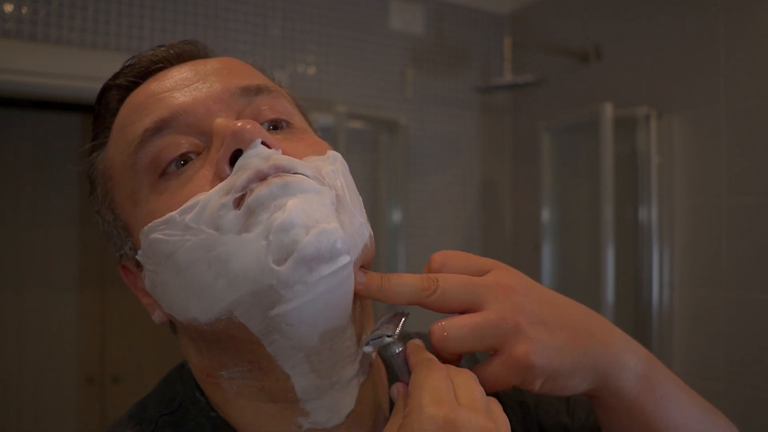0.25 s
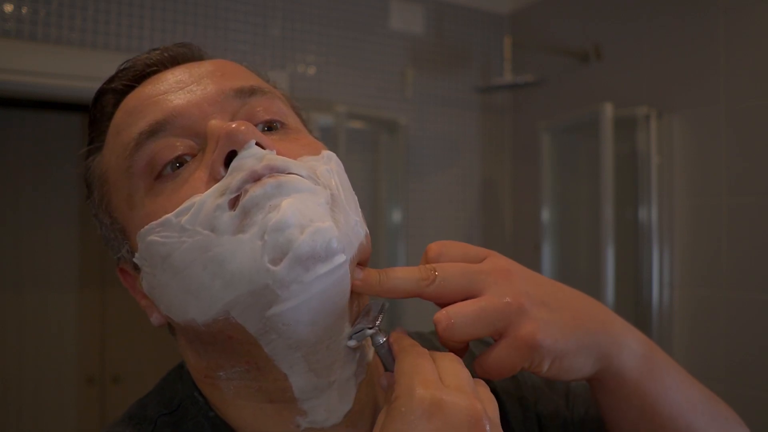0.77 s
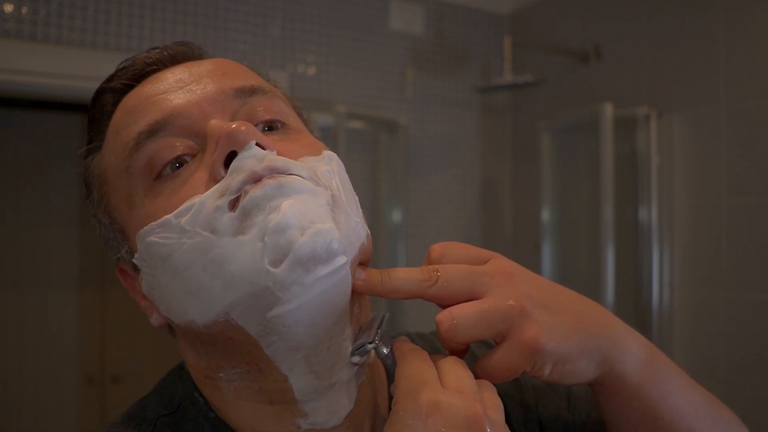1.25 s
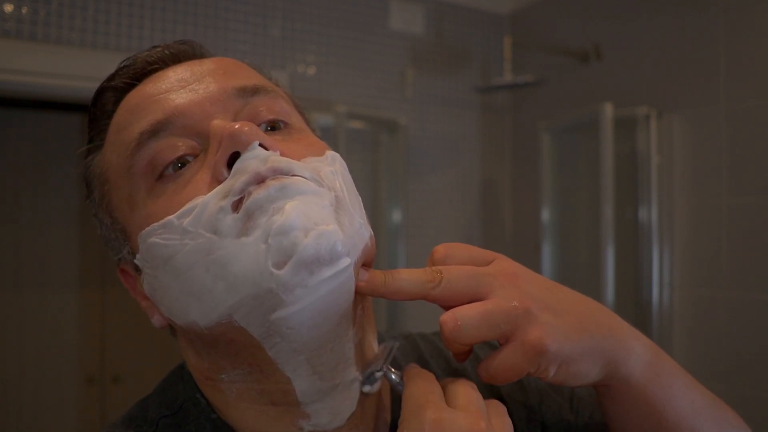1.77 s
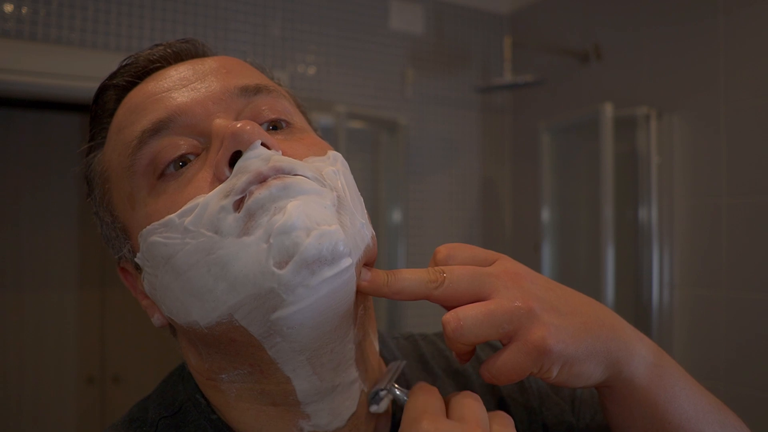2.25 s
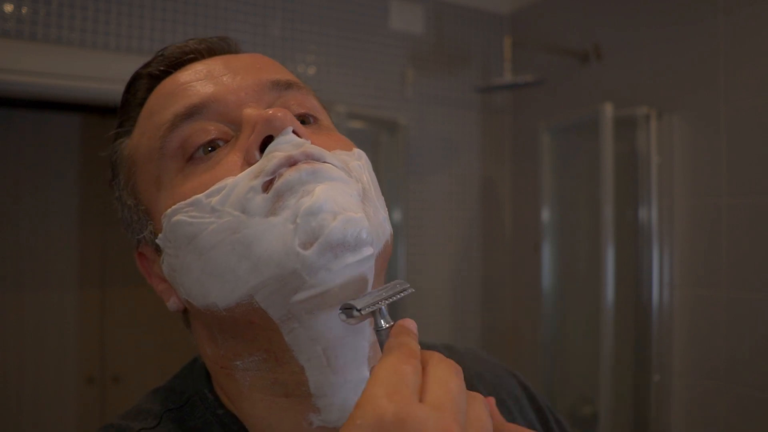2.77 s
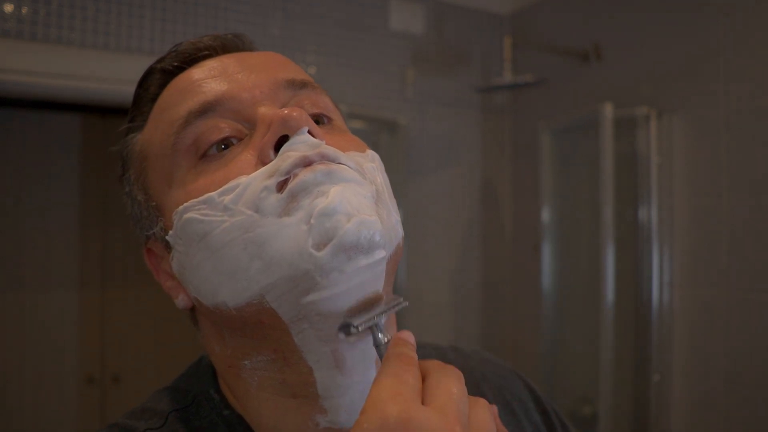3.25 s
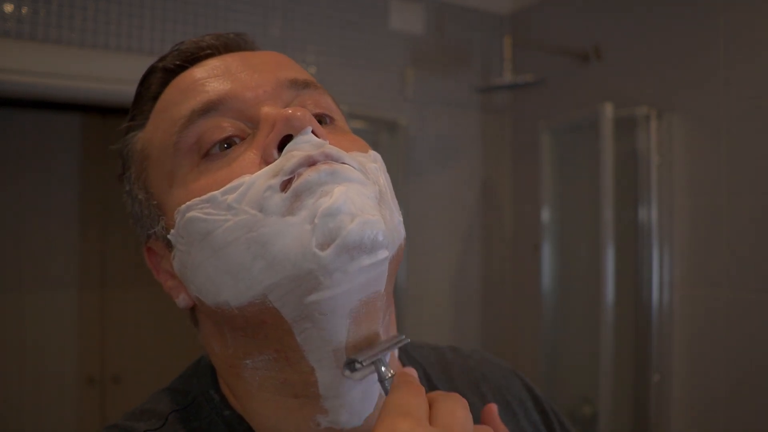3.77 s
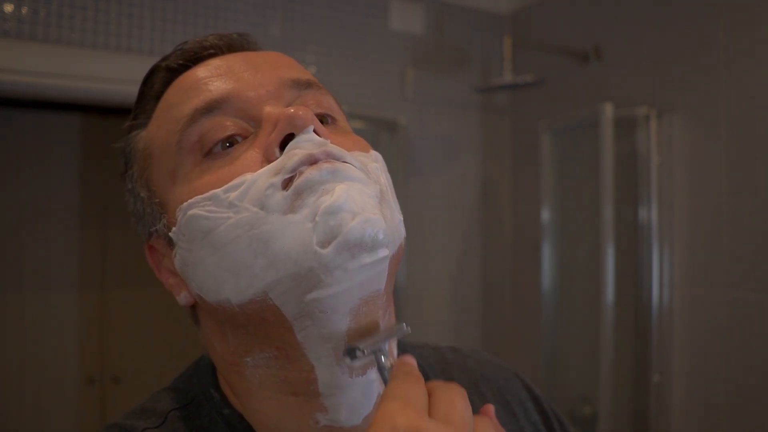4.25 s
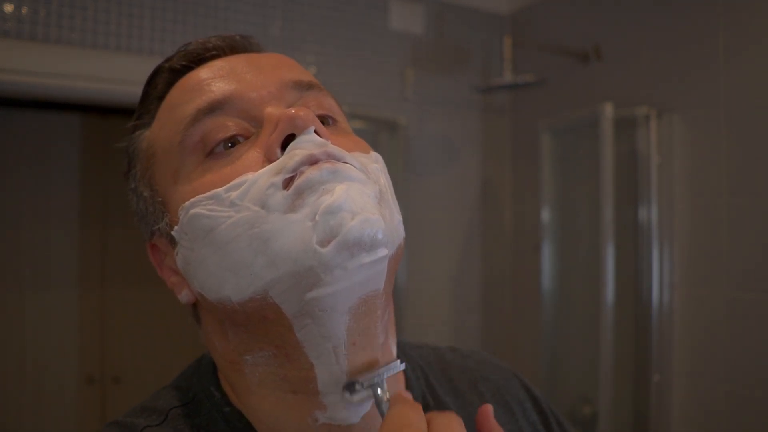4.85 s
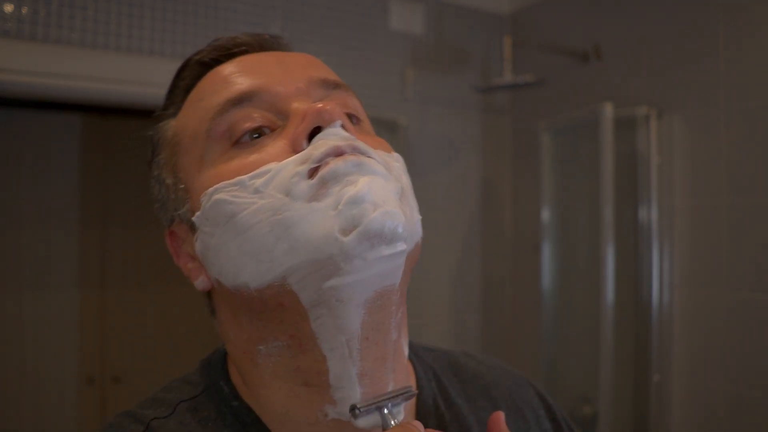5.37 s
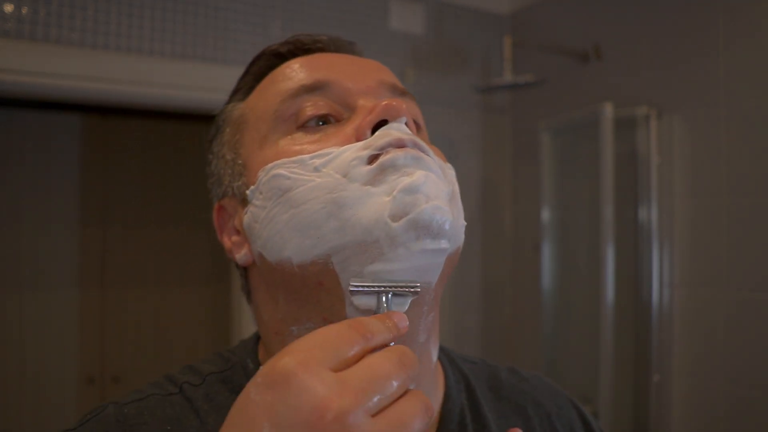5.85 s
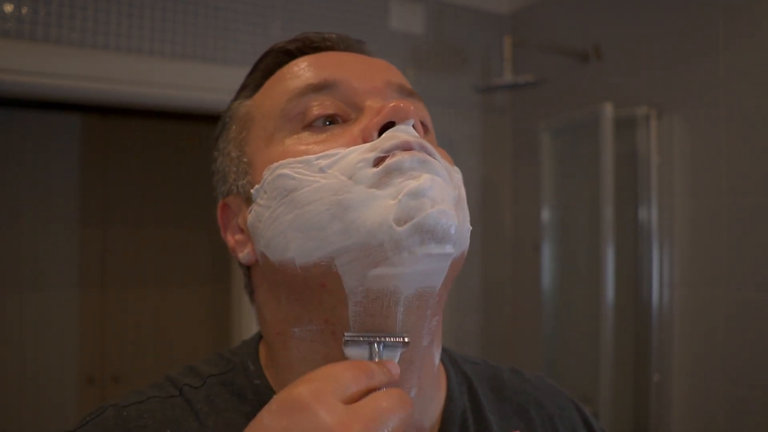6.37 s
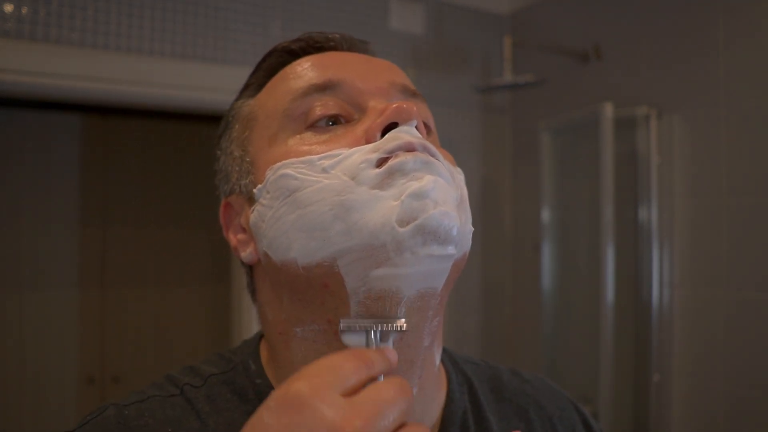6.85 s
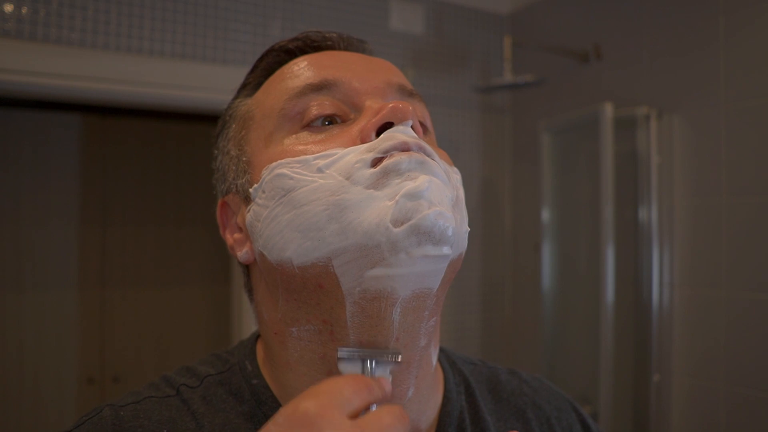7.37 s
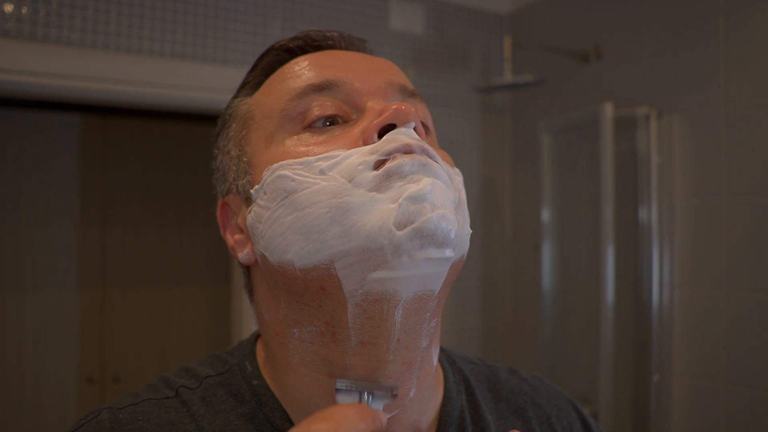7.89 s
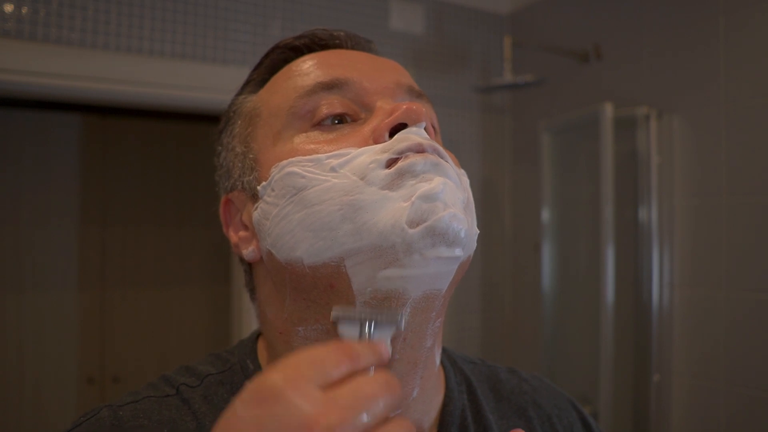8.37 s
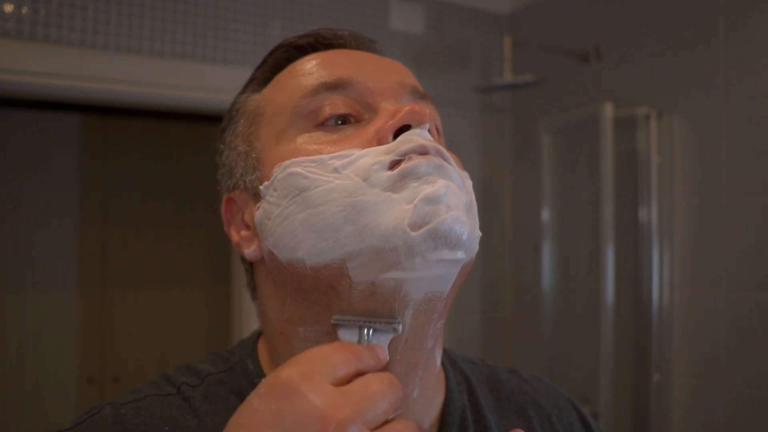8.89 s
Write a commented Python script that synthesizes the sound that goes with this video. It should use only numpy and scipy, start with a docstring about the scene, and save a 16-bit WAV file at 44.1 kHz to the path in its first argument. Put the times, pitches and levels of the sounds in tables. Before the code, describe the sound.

A ventilation fan runs throughout in a small tiled bathroom: soft rushing air, a steady low hum with slight beating, and faint thin whines, one growing after about 5 s. For the first 0.9 s only the fan is heard. Four short razor scrapes follow at about 1.0, 1.3, 1.65 and 2.05 s, with clicks and a faint metallic singing. After a pause, strokes resume at 3.3 s and repeat every 0.4 s until 5.2 s, each swelling into a gritty rasp and cutting off; a sharp tick stands out at 4.1 s. A weak touch clicks at 5.6 s. From 6.25 s brighter, stronger, crisper strokes come every 0.35 s, weakening by 7.7 and 8.1 s. After a short gap, a longer scrape builds from 8.75 s to about 9.2 s with several ticks. Close stereo microphone; dense, bright tile echoes trail every stroke.

```python
"""A safety razor shaves a lathered neck in short strokes, in a small tiled bathroom.
Each stroke is a shower of tiny snaps, stubble being cut, over smooth friction; both ring in blade and head.
Sharp ticks of razor and thick hairs are single blows through the same body; at times the blade sings.
Tile echoes surround the razor; a ventilation fan (filtered noise and tones) and mains hum drone underneath."""
import sys
import numpy as np
from scipy import signal
from scipy.fft import rfft, irfft
from scipy.io import wavfile

SR = 44100
rng = np.random.default_rng(int(sys.argv[2]) if len(sys.argv) > 2 else 0)


def transcribe(u):
    """Save the signal u as a 16-bit wav file named by the first command-line argument.

    u: samples, shape (n,) or (channels, n), limited to [-1, 1]; the rate is SR.
    q: integer samples, one column per channel.
    """
    v = np.clip(np.atleast_2d(u).T, -1, 1)
    q = np.round(v * 32767).astype(np.int16)
    wavfile.write(sys.argv[1], SR, q)


N = 402191  # length [samples]

# the three registers of the razor, spectra before its resonances: (frequency [Hz], relative level [dB])
RING_REGISTER = [(600, -20), (1400, -21), (2000, -9), (2450, 0.5), (2950, 1), (3500, -0.5), (4200, -7),
                 (6000, -44.5)]
SCRAPE_REGISTER = [(1500, -45), (2900, -16), (3500, -16), (4100, -3), (5200, 3), (6700, 0), (8000, -9),
                   (12000, -50.5)]
CRISP_REGISTER = [(4000, -39), (6300, -18.5), (7600, -3), (10500, 3.5), (13000, 3.5), (16000, -2)]


def amp(db):
    """Decibels to gain."""
    return 10 ** (np.asarray(db) / 20)


def unit(x):
    """Scales to rms 1."""
    return x / np.sqrt(np.mean(x ** 2) + 1e-20)


def read(points, hz):
    """Reads a spectrum on a log-frequency axis, held level beyond its ends."""
    f, value = np.transpose(points)
    return np.interp(np.log(hz + 1), np.log(f + 1), value)


def drift(rate_hz):
    """Slow random motion of rms 1: noise under a Gaussian low-pass."""
    hz = np.fft.rfftfreq(N, 1 / SR)
    lowpass = np.exp(-.5 * (hz / rate_hz) ** 2)
    return unit(irfft(rfft(rng.standard_normal(N)) * lowpass, N))


def tone(hz, wander_hz, unsteady):
    """A tone of rms 1, part steady and part wandering in strength and phase."""
    share = np.clip(unsteady, 0, 1)
    phase = 2 * np.pi * (hz * np.arange(N) / SR + rng.random())
    steady = np.sqrt(2 * (1 - share ** 2)) * np.cos(phase)
    wander = drift(wander_hz) * np.cos(phase) + drift(wander_hz) * np.sin(phase)
    return steady + share * wander


def fan_air(level_db=-56):
    """Rushing air: shaped noise, alike on both sides in the lows and ever less so towards the treble."""
    # spectrum of the air: (frequency [Hz], relative level [dB per Hz])
    air_spectrum = [(20, -17.5), (55, -7.5), (75, 1), (140, 3.5), (185, -3.5), (225, 2), (280, -5),
                    (430, -7), (570, -18.5), (720, -18.5), (850, -15), (1300, -21.5), (1800, -20),
                    (3800, -24.8), (6500, -28.5), (9000, -31), (16000, -37)]
    # left-right likeness of the air: (frequency [Hz], likeness [0-1])
    air_likeness = [(100, 1), (250, 0.94), (500, 0.79), (1000, 0.65), (2000, 0.62), (4000, 0.17),
                    (12000, 0.076)]
    hz = np.fft.rfftfreq(N, 1 / SR)
    left, other = rfft(rng.standard_normal((2, N))) * amp(read(air_spectrum, hz))
    same = np.clip(read(air_likeness, hz), 0, 1)
    right = same * left + np.sqrt(1 - same ** 2) * other
    return amp(level_db) * unit(irfft(np.array([left, right]), N))


def fan(waver_hz=1.5, late_hz=1900, late_wander_hz=12, late_unsteady=0.49):
    """Rushing air, two strong low hums with weaker partners, and thin whines."""
    # mains hum and fan tones: (frequency [Hz], level [dB rms], unsteadiness [0-1])
    hum_tones = [(100, -52.5, 0.15), (120.8, -52, 0.25), (70.9, -71.5, 0.3), (95.9, -70, 0.7),
                 (151.8, -65, 0.85), (215.5, -72, 0.65), (244.4, -70.5, 0.92), (306, -72, 0.24),
                 (407.2, -72, 0.31)]
    # thin whines of the fan: (frequency [Hz], width [Hz], level [dB rms], unsteadiness [0-1])
    whine_tones = [(3252, 51, -77, 0.5), (5760, 54, -90, 1), (6630, 22, -87, 1), (6900, 160, -87, 0.9),
                   (10600, 130, -93, 1)]
    # a whine that swells later on: (time [s], level [dB rms])
    late_swell = [(0, -91), (5.2, -84), (5.8, -78), (8.4, -77.5), (9.1, -78.5)]
    air = fan_air()
    hum = sum(amp(db) * tone(f, waver_hz, unsteady) for f, db, unsteady in hum_tones)
    whine = sum(amp(db) * tone(f, width / 2, unsteady) for f, width, db, unsteady in whine_tones)
    swell = amp(np.interp(np.arange(N) / SR, *np.transpose(late_swell)))
    return air + hum + whine + swell * tone(late_hz, late_wander_hz, late_unsteady)


def reflections(first_s=.003, early_db=3, early_s=0.026, echoes_per_s=8000):
    """Dense echoes from the tiles, different at each microphone, with a decay time that varies with pitch."""
    # tiled room: (frequency [Hz], time to fall 60 dB [s])
    room_decay = [(500, 1), (2500, 0.83), (5000, 0.67), (9000, 0.5), (16000, 0.7)]
    t = np.arange(SR // 2) / SR
    taps = rng.standard_normal((2, len(t))) * (rng.random((2, len(t))) < echoes_per_s / SR)
    taps *= t > first_s
    taps *= 1 + amp(early_db) * np.exp(-t / early_s)  # the near walls answer strongest
    hz, when, z = signal.stft(taps, SR, nperseg=256)
    decay = amp(-60 * when / read(room_decay, hz)[:, None])
    tail = signal.istft(z * decay, SR)[1]
    return tail / np.linalg.norm(tail, axis=1, keepdims=True)


def bathroom(x, wet_db=-1, move_hz=2.3, count=3):
    """Direct sound plus echoes whose pattern shifts as hand and head move."""
    turn = np.pi * move_hz * np.arange(N) / SR  # half a turn per move
    wet = 0
    for k in range(count):
        # the echo patterns take turns, at constant total power
        share = np.sqrt(2 / count) * np.cos(turn + np.pi * k / count)
        wet = wet + signal.oaconvolve((share * x)[None], reflections(), axes=1)[:, :N]
    return x + amp(wet_db) * wet


def placed(pair):
    """Long waves reach both ports nearly alike; short ones bend round the case, differing in level and phase."""
    # two close microphone ports:
    # (frequency [Hz], left minus right [dB], phase by which left leads [rad], width of the room [dB])
    port_response = np.array([(2400, -1, 0.38, -18), (3350, 1.5, 0.58, -8.5), (4500, 0.5, 0, -6.5),
                              (5430, 2.5, 1, -9), (6650, 5, -1.5, -4.5), (7700, -0.5, -1.5, 5.5),
                              (8340, 6, -0.7, 8.5), (8600, 5.5, 2.4, 3), (9400, -0.5, -2.3, 6),
                              (10800, 2.5, 0.6, 2), (12000, -0.5, 1.2, -3), (13200, 0.5, 1.4, -0.5),
                              (16000, 5, 0.8, 3)])
    hz = np.fft.rfftfreq(N, 1 / SR)
    lean, lead, width = (read(np.c_[port_response[:, 0], column], hz) for column in port_response.T[1:])
    left, right = rfft(pair)
    mid = (left + right) / 2
    side = amp(width) * (left - right) / 2
    turn = amp(lean / 2) * np.exp(1j * lead / 2)
    return irfft(np.array([(mid + side) * turn, (mid - side) / turn]), N)


def razor_body(x, register, taut=1, grip=1, size=2048):
    """Rings x through one register of the razor: a causal minimum-phase filter of energy 1."""
    # resonances of blade and head at grip 1: (frequency [Hz], width [Hz], lift [dB])
    resonances = [(2495, 140, 4), (2760, 130, 1), (3380, 430, 6), (4400, 440, 4), (4800, 120, -0.5),
                  (5400, 580, 5), (6720, 640, 6.5), (7650, 380, 3.5), (8850, 500, 5.5), (10400, 1100, 2.5),
                  (12800, 290, 1.5)]
    hz = abs(np.fft.fftfreq(size, 1 / SR))
    db = read(register, hz / taut)
    db = db + sum(lift / (1 + (2 * (hz - f * grip) / width) ** 2) for f, width, lift in resonances)
    spectrum = np.exp(np.conj(signal.hilbert(np.log(amp(db)))))  # phase follows from the level
    ring = np.fft.ifft(spectrum).real[:size // 2]
    return signal.oaconvolve(x, ring / np.linalg.norm(ring))[:len(x)]


def singing(wander_hz=25, unsteady=0.83):
    """Stick and slip keep one mode of the blade ringing for a moment."""
    # swells of the singing blade, dry:
    # (time [s], half length [s], frequency [Hz], level before the swell shape [dB rms])
    sung_notes = [(1.416, .04, 2474, -67), (1.775, .05, 2580, -65), (2.164, 0.046, 2510, -65),
                  (3.73, 0.037, 2513, -59), (4.565, .03, 5280, -69), (6.3, 0.063, 5430, -66),
                  (6.678, 0.054, 5340, -62)]
    t, out = np.arange(N) / SR, 0
    for s, half, hz, db in sung_notes:
        swell = np.exp(-((t - s) / half) ** 2)
        out = out + amp(db) * swell * tone(hz, wander_hz, unsteady)
    return out


def ticks(level_db=5.5, scrape_db=-4, chatter=0.19, chatter_s=0.0016, size=400):
    """A sharp blow with a millisecond or two of blade chatter, rung through all three registers."""
    # sharp ticks of the razor and of thick hairs:
    # (time [s], blow level before level_db [dB], low ring re blow [dB])
    tick_list = [(0.9192, -38, -18), (1.0282, -33, -8), (1.124, -36, -5), (1.345, -46.5, 9.5),
                 (1.4202, -32.5, -3), (1.6444, -43, -6), (3.3633, -41, 2), (3.7873, -30.5, -8),
                 (4.1211, -22, -19), (4.4705, -27.5, -17), (4.791, -44, -11), (5.5933, -27, -7.5),
                 (6.3659, -28, -11), (6.6443, -38.5, -19), (6.7043, -29, -18), (6.8553, -42, -6),
                 (7.06, -34, -16), (7.3726, -39, -16), (8.6997, -44, -12), (8.8538, -33, -6),
                 (8.965, -32, -10), (9.0093, -33, -16.5), (9.0918, -30.5, -20)]
    blows, low = np.zeros((2, N + size))
    for (s, db, ring), noise in zip(tick_list, rng.standard_normal((len(tick_list), size))):
        blow = chatter * noise * np.exp(-np.arange(size) / SR / chatter_s)
        blow[0] = 1
        blow = irfft(np.exp(1j * np.angle(rfft(blow))), size)  # equally strong at every pitch
        at = round(s * SR)
        blows[at:at + size] += amp(db + level_db) * blow
        low[at:at + size] += amp(db + level_db + ring) * blow
    crisp = razor_body(blows, CRISP_REGISTER)
    scrape = amp(scrape_db) * razor_body(blows, SCRAPE_REGISTER)
    return (crisp + scrape + razor_body(low, RING_REGISTER))[:N]


def stubble(hairs_per_s=1100, spread_db=4.5, largest=2.9, clump_db=2.5, clump_hz=70, glide=0.53):
    """Hairs of uneven size snap in clumps over the smooth friction of the blade on lather."""
    size = amp(spread_db * np.minimum(rng.exponential(1, N), largest))
    snaps = size * rng.choice([-1, 1], N) * (rng.random(N) < hairs_per_s / SR)
    friction = glide * rng.standard_normal(N)
    return unit((unit(snaps) + friction) * amp(clump_db * drift(clump_hz)))


def pressure(t, press_s, drag_s, creep_db, bite_db, creep_s=0.041, curve=1.38, release_db_per_s=279):
    """Gain of one stroke: the blade creeps through lather, bites, presses in, drags and eases off."""
    # curve above 1: the pressure builds fast at first and then levels off
    rise_db = bite_db * np.clip(1 - t / press_s, 0, 1) ** curve
    leaving_s = np.maximum(t - press_s - drag_s, 0)
    creep = np.where(t < 0, amp(creep_db) * np.exp(np.minimum(t, 0) / creep_s), 1)
    return creep * amp(rise_db - release_db_per_s * leaving_s)


def strokes(scrape_db=-1.27, ring_db=-0.85, crisp_db=-0.66, ring_rub=0.72, scrape_rub=0.86,
            grip_spread=0.0061, patchy_db=1.12, patchy_hz=14, approach_s=.06, release_s=0.15,
            ring_lag_db=1, crisp_fade_db=2.5):
    """Each stroke drives the razor; blade angle and skin tension shift weight between its registers."""
    # razor strokes; the last three columns are trimmed by scrape_db, ring_db and crisp_db:
    # (start [s], press-in [s], full drag [s], creep through the lather re first bite [dB],
    #  first bite re full drag [dB], stroke level [dB], blade ring re stroke [dB], crisp top re stroke [dB])
    stroke_list = [ (0.96, 0.047, 0.06, -12, -11, -53.5, -2, -1), (1.338, .042, 0.058, -6, -8.5, -56, 2, 0),
                   (1.645, 0.13, 0.028, -16, -12.5, -52, 0.9, -1),
                   (2.054, 0.066, .11, -25, -8, -56.7, 2.5, -2),
                   (3.263, 0.11, 0.027, -10, -13.5, -55, -6, -5.5),
                   (3.635, 0.074, 0.071, 1, -15, -50.5, -4, -4),
                   (3.998, 0.096, 0.071, -1.5, -14, -51, -4, -1.5),
                   (4.395, 0.069, 0.11, -10, -13, -52.6, -3, 0), (4.79, .1, 0.041, -22, -16, -53, -4.5, 0),
                   (5.157, .095, .05, -4, -9, -54.5, -3.5, -2), (5.594, .015, .03, -30, 0, -56.5, -5.5, -9),
                   (6.254, 0.068, 0.043, -1.5, -13, -49, -10, -0.5),
                   (6.645, 0.077, 0.028, -3, -17, -48.1, -10, 0),
                   (6.993, 0.094, 0.054, -10, -12.5, -50, -11, 1),
                   (7.372, 0.079, 0.045, -25, -11, -52, -12, 0),
                   (7.721, 0.075, 0.1, -7, -8, -57.5, -9.5, 1),
                   (8.063, 0.058, 0.08, -3, -3.5, -62.5, -7, 2.5),
                   (8.75, 0.3, .12, -12, -10.5, -51, -13, -5.5)]
    # skin tension retunes the razor, tauter is higher:
    # (time [s], factor on the pitch of the ring [ratio], factor on the pitch of the scrape [ratio])
    skin_tension = [(1, 0.94, 0.99), (2.2, 0.9, 0.97), (3.7, 0.96, 1), (4.5, 1.01, 1.045),
                    (5.3, 1.15, 0.97), (5.6, 0.69, 0.82), (6.3, 0.86, 0.93), (7.1, 0.99, 0.93),
                    (8.1, 1.18, 1.005), (8.9, 1.58, 0.9)]
    t, out, cuts = np.arange(N) / SR, np.zeros(N), stubble()
    when, *factors = np.transpose(skin_tension)
    beard = amp(patchy_db * drift(patchy_hz))  # the stubble grows in patches
    # the lower registers carry more of the smooth rubbing
    drives = [unit(beard * (cuts + rub * rng.standard_normal(N))) for rub in (ring_rub, scrape_rub, 0)]
    registers = RING_REGISTER, SCRAPE_REGISTER, CRISP_REGISTER
    grips = 1 + grip_spread * rng.standard_normal(len(stroke_list))  # each stroke detunes the resonances
    for (start, press_s, drag_s, creep, bite, level, ring, crisp), grip in zip(stroke_list, grips):
        length = press_s + drag_s
        on = (t >= start - approach_s) & (t < start + length + release_s)
        contact = pressure(t[on] - start, press_s, drag_s, creep, bite)
        late = np.clip((t[on] - start) / length, 0, 2) - .5  # 0 halfway through the stroke
        tunings = [np.interp(start + press_s, when, factor) for factor in factors] + [1]
        ring_weight = ring + ring_db + ring_lag_db * late  # the blade rings more freely towards the end
        crisp_weight = crisp + crisp_db - crisp_fade_db * late  # the crisp top is strongest early on
        weights = ring_weight, scrape_db, crisp_weight
        for db, drive, register, taut in zip(weights, drives, registers, tunings):
            push = contact * amp(level + db) * drive[on]
            out[on] += razor_body(push, register, taut, grip)
    return out


def scene():
    """The razor in the room, over the fan."""
    razor = strokes() + singing() + ticks()
    return placed(bathroom(razor)) + fan()


def record(dry, edge_hz=15850):
    """The recorder's band limit: a steep low-pass."""
    lowpass = signal.firwin(511, edge_hz, window=("kaiser", 9), fs=SR)
    return signal.oaconvolve(dry, lowpass[None], "same")


dry = scene()
out = record(dry)
transcribe(out)
```